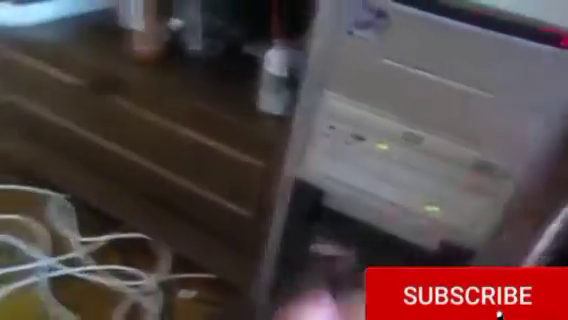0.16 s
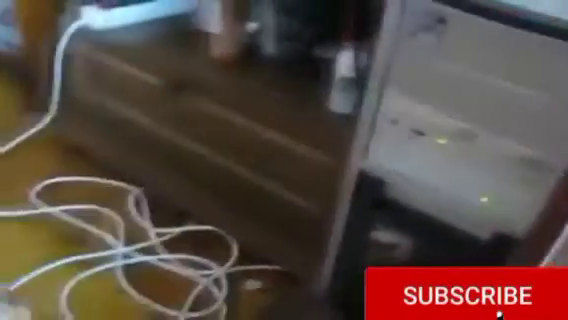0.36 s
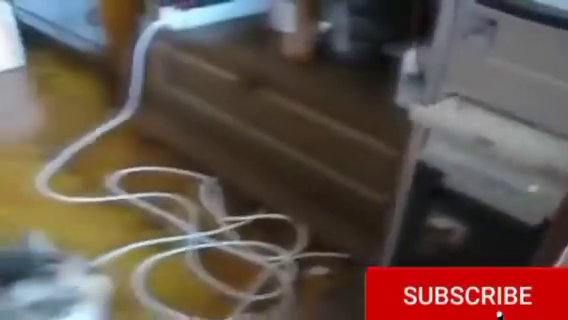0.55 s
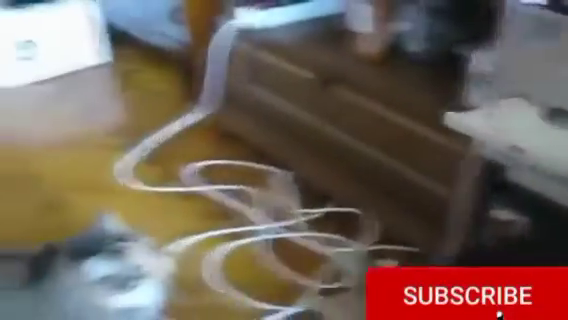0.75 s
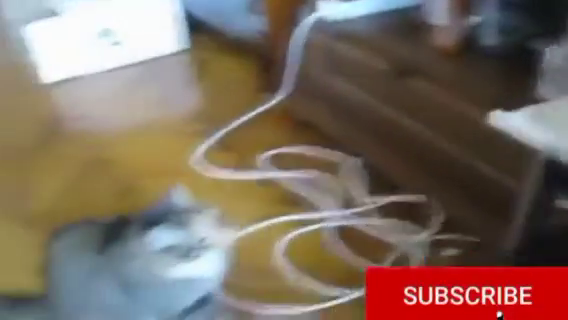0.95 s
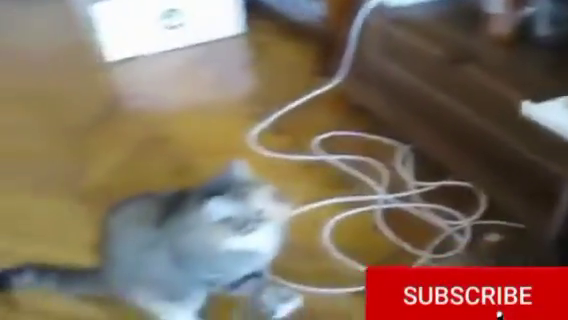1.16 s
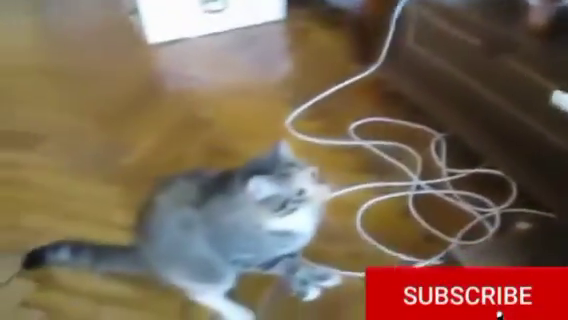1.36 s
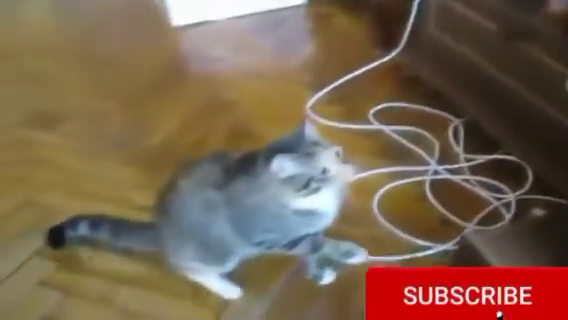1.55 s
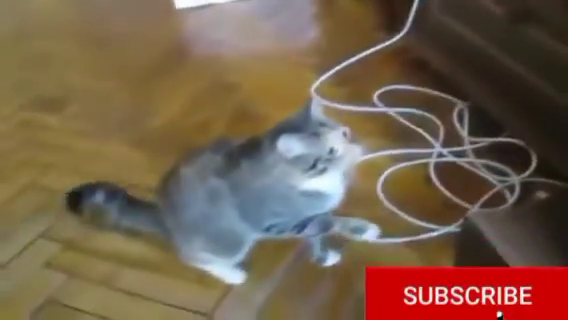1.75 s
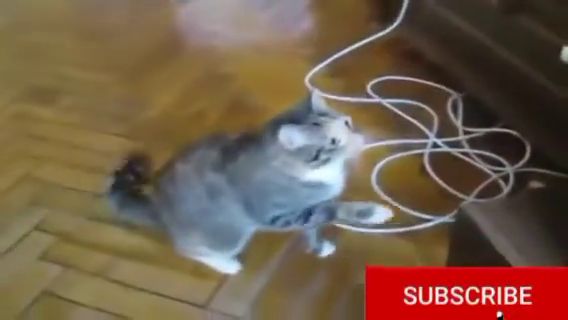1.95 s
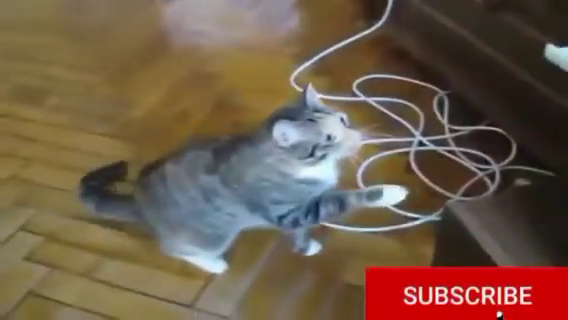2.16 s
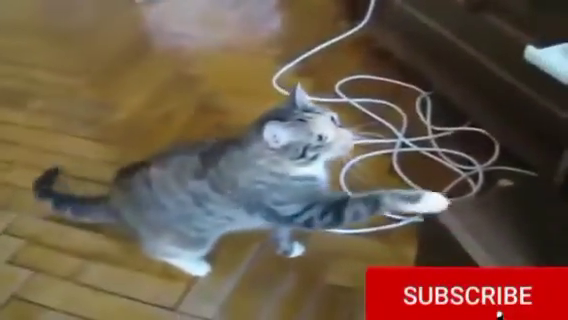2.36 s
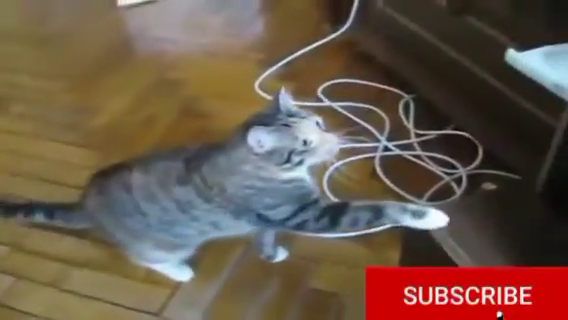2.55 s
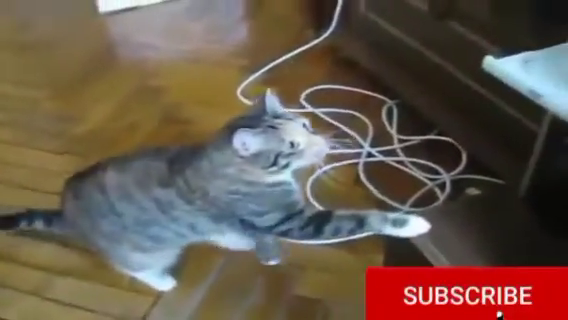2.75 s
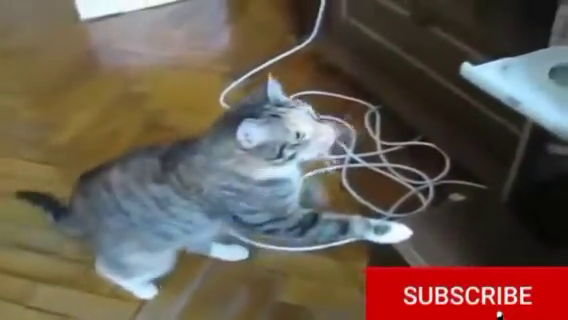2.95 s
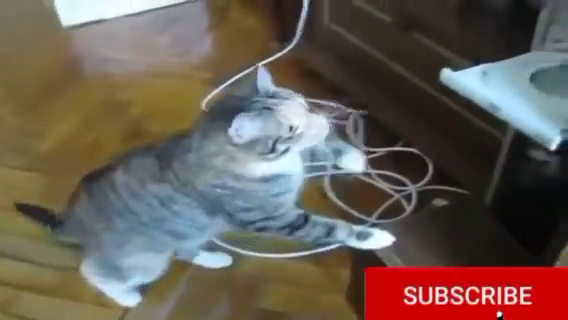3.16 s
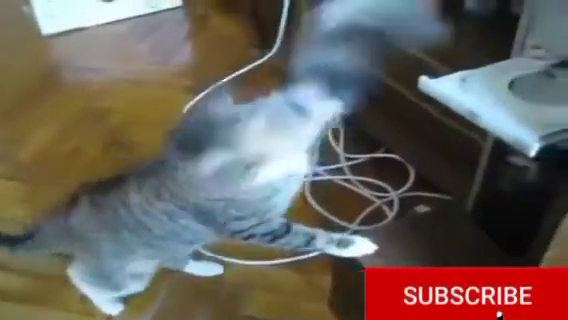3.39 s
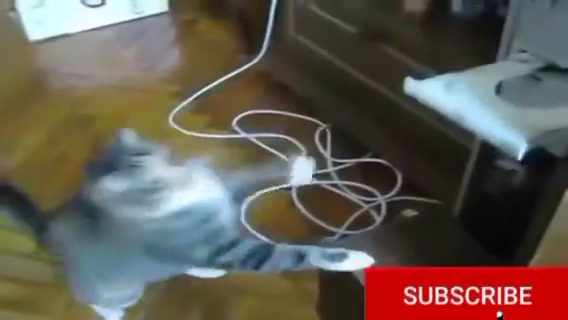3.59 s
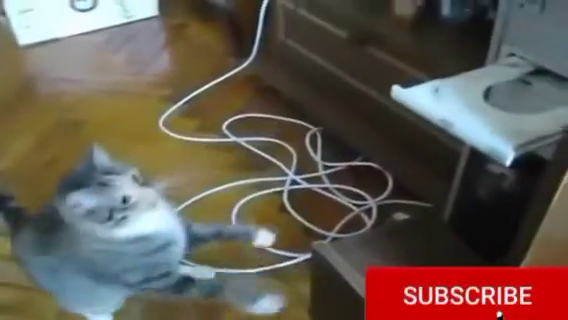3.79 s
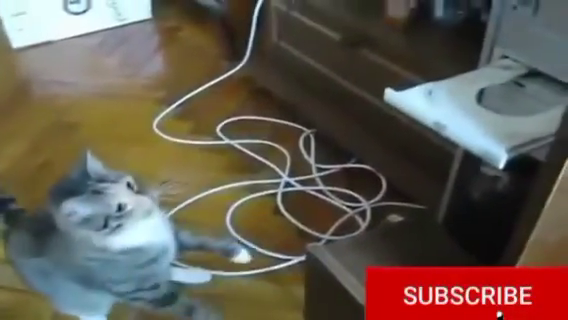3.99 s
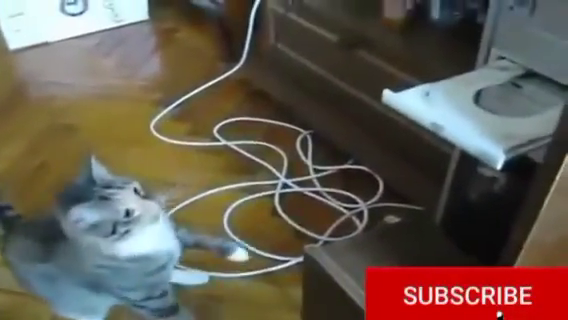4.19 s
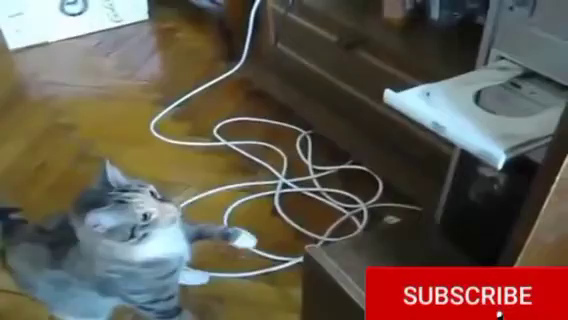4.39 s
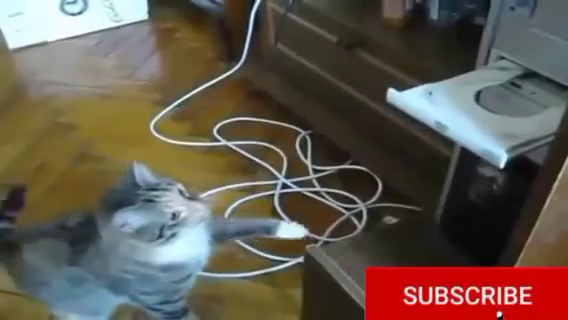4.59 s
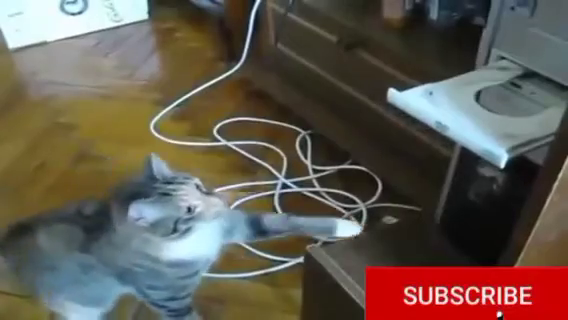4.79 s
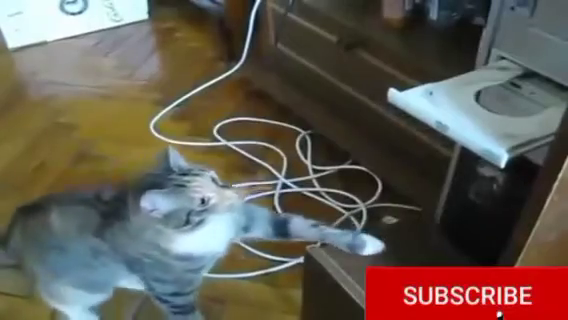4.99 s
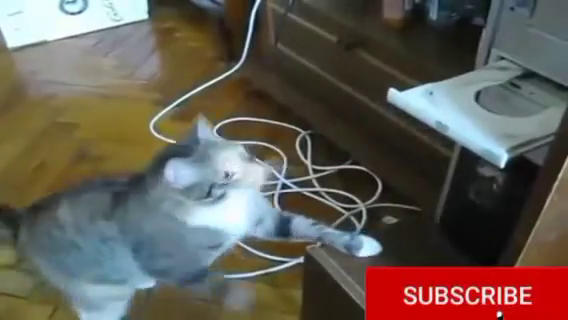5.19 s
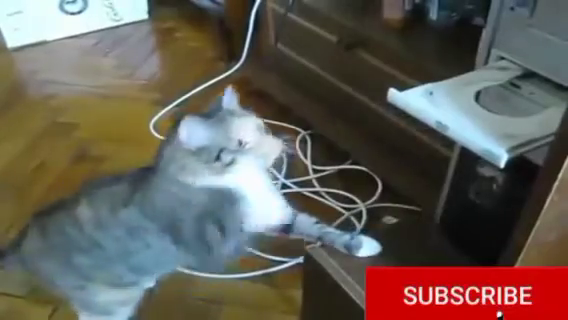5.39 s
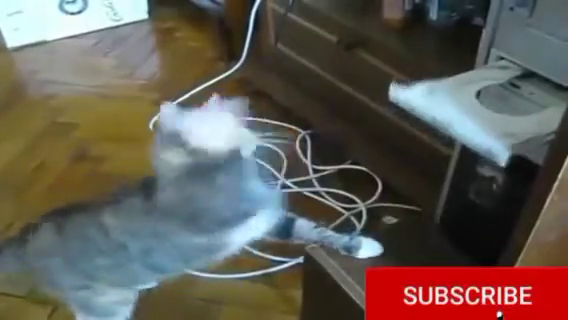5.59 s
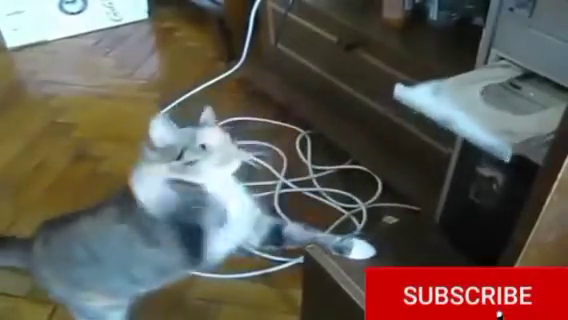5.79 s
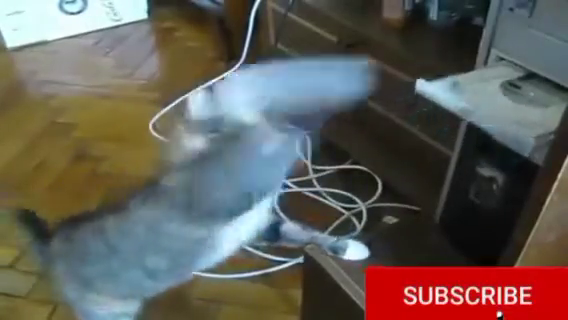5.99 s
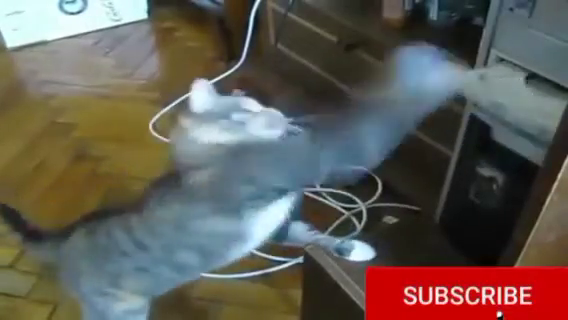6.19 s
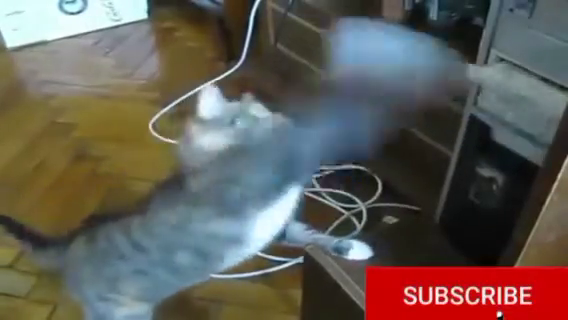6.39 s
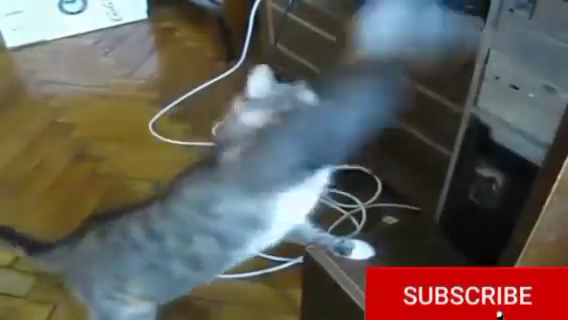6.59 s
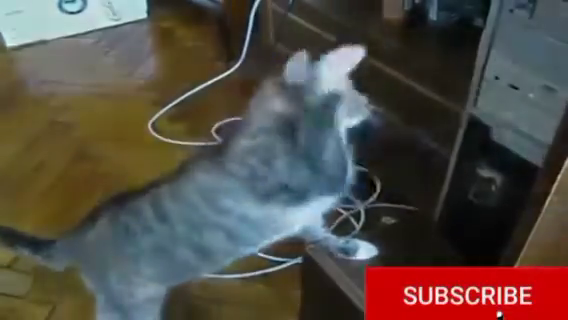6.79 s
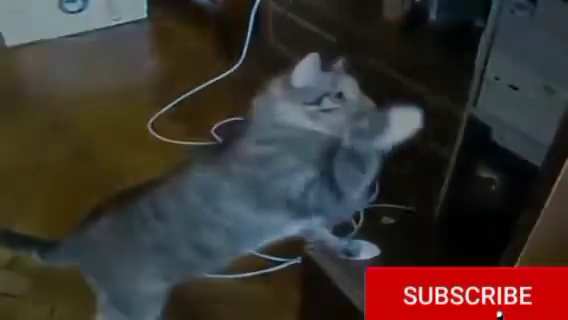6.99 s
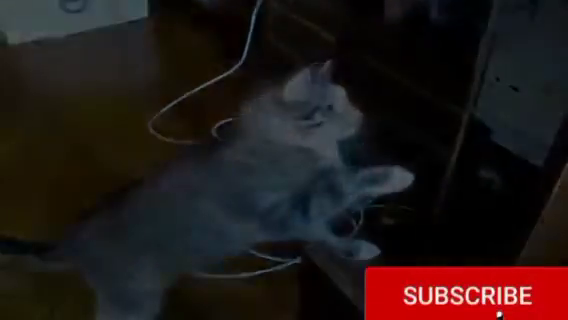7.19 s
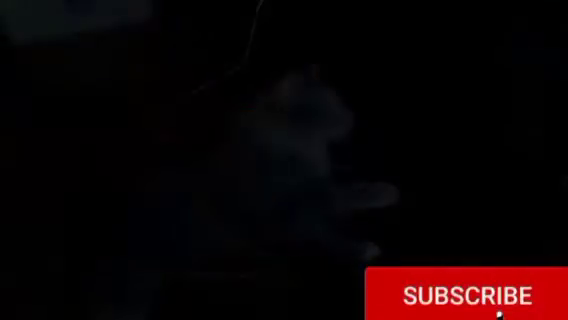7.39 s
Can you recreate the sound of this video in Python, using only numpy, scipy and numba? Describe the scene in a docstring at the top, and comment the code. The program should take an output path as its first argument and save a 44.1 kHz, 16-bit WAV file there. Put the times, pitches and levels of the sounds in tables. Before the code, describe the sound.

In a live room, a desktop computer's fans rush steadily. The disc tray unlatches with quick clicks and whines outward on small gears. After a pause a cat's paw cracks the plastic, leaving it chattering. Later a dry static pop comes, then a flurry of swats over the motor pulling the tray in, ending with a hard latch. A small close microphone clips on the blows.

```python
"""A desktop computer hums with filtered noise and fan tones; a disc hisses until it is braked.
The tray unlatches with knocks and whirs out on gear noise and whine, in a live room.
A cat swats it: bursts ring the plastic, and the tray chatters and scrapes in its rails.
A static spark pops; then the cat bats the tray while it runs back in and latches.
A small camera clips on hard blows and ducks after each, so the room's ring swells back up."""
import sys
import numpy as np
from scipy import signal
from scipy.fft import rfft, irfft, next_fast_len
from scipy.io import wavfile
from scipy.ndimage import map_coordinates
from numba import njit

SR = 44100
rng = np.random.default_rng(int(sys.argv[2]) if len(sys.argv) > 2 else 0)


def store_wav(level_fs):
    """Save 16-bit WAV to argv[1]."""
    pcm = np.round(np.clip(np.atleast_2d(level_fs), -1, 1) * 32767)
    wavfile.write(sys.argv[1], SR, pcm.T.astype(np.int16))


N = 328545
TIME = np.arange(N) / SR


def amp(db):
    """Turn decibels into a gain."""
    return 10 ** (np.asarray(db) / 20)


def unit(x):
    """Scale a sound to an rms of 1."""
    return x / np.sqrt(np.mean(x ** 2) + 1e-20)


def along(points, hz):
    """Read a table of (frequency [Hz], value) on a logarithmic pitch axis."""
    f, v = np.transpose(points)
    return np.interp(np.log(hz + 1), np.log(f), v)


def curves(rows):
    """Draw each column after the time as one value per sample."""
    s, *columns = np.transpose(rows)
    return [np.interp(TIME, s, column) for column in columns]


def wobble(rate):
    """Make a smooth random curve from `rate` random points a second."""
    points = rng.standard_normal(int(N * rate / SR) + 4)
    return map_coordinates(points, [TIME * rate])


def bumps(modes, hz):
    """Add up the power of resonances, each with a centre, a width and a level."""
    return sum(amp(db) ** 2 / (1 + (2 * (hz - centre) / width) ** 2) for centre, width, db in modes)


def coloured(x, gain):
    """Filter with a gain for each frequency; minimum phase, so no sound comes before its cause."""
    size = 2 * next_fast_len(len(x) // 2 + 2048)
    gains = np.maximum(gain(np.fft.rfftfreq(size, 1 / SR)), 1e-6)
    cepstrum = irfft(np.log(gains))
    # fold the negative-time half onto the positive one
    cepstrum[1:size // 2] *= 2
    cepstrum[size // 2 + 1:] = 0
    return irfft(rfft(x, size) * np.exp(rfft(cepstrum)))[:len(x)]


# how loud the fan air is, nearer at first: (time [s], level [dB])
FAN_LEVEL = [(.3, -43.6), (1.6, -47), (7.45, -47)]
# colour of the rushing air: (frequency [Hz], level [dB])
FAN_AIR = [(15, -36), (25, -6.5), (286, -5.5), (318, -7), (637, -6.5), (927, -4), (1060, -8), (1280, -4),
           (1500, -8.5), (2300, -11), (2630, -14), (6540, -19.5), (8100, -25.5), (10000, -23.5),
           (15000, -30)]
# resonances of the vents: (frequency [Hz], width [Hz], level [dB])
FAN_VENTS = [(825, 120, -24.5), (1225, 69, 2), (1745, 106, 7.5), (2315, 56, 12), (3380, 930, 3),
             (4660, 140, 3.5)]
# steady notes of the fans and disk: (frequency [Hz], level [dB])
FAN_TONES = [(863, -63), (959.5, -60), (1261, -62.5)]


def fans():
    """Air rushes through the vents of the case, under slightly unsteady fan and disk tones."""
    noise = rng.standard_normal(N)
    air = unit(coloured(noise, lambda hz: amp(along(FAN_AIR, hz)) * np.sqrt(1 + bumps(FAN_VENTS, hz))))
    tones = np.zeros(N)
    for hz, db in FAN_TONES:
        level = amp(db + 1.15 * wobble(3.27))
        phase = 2 * np.pi * np.cumsum(hz + 1.466 * wobble(5)) / SR
        tones += level * np.sqrt(2) * np.sin(phase)
    return air * amp(curves(FAN_LEVEL)[0] + 0.1 * wobble(9.6)) + tones


def spinning(db=-61, low_hz=9000, high_hz=12000, stop_s=0.54, coast_s=.12):
    """A disc hisses faintly inside the drive until it is braked for ejecting."""
    band = signal.butter(2, [low_hz, high_hz], "band", fs=SR, output="sos")
    hiss = unit(signal.sosfilt(band, rng.standard_normal(N)))
    fade = np.clip((stop_s - TIME) / coast_s + .5, 0, 1)  # halfway down at stop_s
    return amp(db) * fade * hiss


# time for the room's ring to fade by 60 dB: (frequency [Hz], fade time [s])
ROOM_T60 = [(150, 0.43), (400, 0.67), (1000, 0.53), (2800, 0.57), (7000, 0.42), (14000, 0.19)]
# how strongly the room answers: (frequency [Hz], level [dB])
ROOM_SEND = [(60, -10), (150, -1.5), (280, -1), (900, -1.5), (2000, -5.5), (4000, -10), (12000, -5.5)]
# the room's share grows as the camera backs away from the drive: (time [s], level [dB])
NEARNESS = [(0, -3), (.6, -1), (1.3, 0)]


def room(x, s, build_s=0.0016):
    """Add a dense echo that builds up quickly, fades by pitch and differs with the moment s."""
    hz, t, cells = signal.stft(rng.standard_normal(SR * 3 // 4), SR, nperseg=256)
    fade = amp(-60 * t / along(ROOM_T60, hz)[:, None])
    tail = signal.istft(cells * fade * (1 - np.exp(-t / build_s)), SR, nperseg=256)[1]
    size = next_fast_len(len(x) + len(tail), True)
    share_db = np.interp(s, *np.transpose(NEARNESS))
    send = amp(along(ROOM_SEND, np.fft.rfftfreq(size, 1 / SR)) + share_db)
    echo = send * rfft(tail / np.linalg.norm(tail), size)
    return irfft(rfft(x, size) * (1 + echo), size)


def case(x, ripple_db=1.65, spacing_hz=40, onset_hz=2500):
    """Many small overlapping modes of the case put a fine fixed ripple on the treble."""
    grid = np.arange(1000) * spacing_hz
    ripple = rng.standard_normal(len(grid)) * np.minimum(grid / onset_hz, 1)
    return coloured(x, lambda hz: amp(ripple_db * np.interp(hz, grid, ripple)))


# overall colour of the plastic: (frequency [Hz], level [dB])
PLASTIC = [(60, -25.5), (150, -14.5), (260, -14), (800, -10), (2000, -3.5), (3200, -0.5), (4600, 1),
           (6500, -4.5), (10000, -12), (15000, -20.5)]
# main resonances of tray and case: (frequency [Hz], width [Hz], level [dB])
MODES_TRAY = [(246, 43, 3), (572, 190, 2), (1135, 80, 1.5), (1780, 300, -4), (2650, 310, -5),
              (3330, 340, -4.5), (3930, 86, -5.5), (5230, 160, -32.5), (6230, 85, -24)]


def plastic(hz, dense_db=-3):
    """The tray's main modes stand on a bed of many overlapping ones."""
    return amp(along(PLASTIC, hz)) * np.sqrt(amp(dense_db) ** 2 + bumps(MODES_TRAY, hz))


NOTE_DB, NOTE_WIDTH = 4.5, 0.12  # how far a struck spot's mode stands out; its width over its frequency


def knock(s, db, t60, body_db, edge_db, note_hz=None, low_hz=280, body_hz=1400, clack_hz=3200,
          bright_hz=6000, edge_hz=10000, softness=0.96, ring_db=-19, ring_t60=0.088):
    """One contact is a short noise burst that rings the tray; body and edge levels set its colour."""
    out, t = np.zeros(N + 2 * SR), np.arange(SR // 8) / SR
    norm = np.sqrt(np.mean(plastic(np.linspace(0, SR / 2, num=SR // 20)) ** 2))
    # long contacts are scrapes and start softly
    rise = 1 - np.exp(-t / (softness * t60 ** 2))
    # the case rings on a little after each contact
    fade = amp(-60 * t / t60) + amp(ring_db - 60 * t / ring_t60)
    burst = np.sign(rng.standard_normal(len(t))) * rise * fade
    contact = [(low_hz, body_db / 2), (2 * low_hz, body_db), (body_hz, body_db),
               (clack_hz, 0), (bright_hz, 0), (edge_hz, edge_db)]
    # one well-damped mode stands out, depending on the struck spot
    spot = [(note_hz, NOTE_WIDTH * note_hz, NOTE_DB)] if note_hz else []
    ring = coloured(burst, lambda hz: plastic(hz) * amp(along(contact, hz)) * np.sqrt(1 + bumps(spot, hz)))
    blow = room(ring / norm, s)
    out[round(s * SR):][:len(blow)] = amp(db) * blow
    return out[:N]


# tray runs: outward the pitch leaps up and then sags; inward it climbs slowly and drops at the end:
# (time [s], gear whir level [dB], gear mesh rate [Hz])
RUN_OUT = [(.5, -46, 2318), (.6, -38, 2337), (.665, -42, 5490), (.75, -41, 5580), (.79, -41, 4150),
           (.9, -42.5, 3150), (1.16, -44, 3090), (1.355, -43.5, 2753), (1.385, -51, 2500)]
RUN_IN = [(5.95, -44, 2435), (6.05, -31, 2933), (6.25, -49, 3080), (6.52, -38, 3120), (6.78, -36, 3240),
          (6.9, -44, 2300)]
# colour of the gear whir: (frequency [Hz], level [dB])
WHIR = [(100, -32), (300, -11.5), (700, -3.5), (1800, -2), (3300, 4), (5500, -1.5), (7500, -6.5),
        (11000, -15.5), (15000, -16)]
# whine notes: (multiple of the motor pulse rate, level [dB])
GEAR_ORDERS = [(7, -12), (9, 3), (11, -5.5), (12, -9), (16, -11), (18, -12)]


def drive(travel, whine_db, case_ring_db, jitter=0.0201, rattle_db=1.5, waver_db=4, speed_db=6):
    """Gear teeth rasp once a motor pulse and whine at multiples of that changing rate."""
    db, mesh_hz = curves(travel)
    start, stop = travel[0][0], travel[-1][0]
    pulse_hz = mesh_hz / 9 * (1 + jitter * wobble(150))
    motor = 2 * np.pi * np.cumsum(pulse_hz) / SR
    teeth = rng.standard_normal(N) * (1 + 0.41 * np.cos(motor)) * amp(rattle_db * wobble(90))
    rasp = unit(coloured(teeth, lambda hz: amp(along(WHIR, hz))))
    whine = np.zeros(N)
    for order, order_db in GEAR_ORDERS:
        whine += amp(whine_db + order_db + waver_db * wobble(55.1)) * np.sin(order * motor)
    # the whine is louder by speed_db per octave of speed
    usual_hz = np.median(mesh_hz[(TIME > start) & (TIME < stop)])
    whine = whine * amp(speed_db * np.log2(mesh_hz / usual_hz))
    # a low ring of the case, near 260 Hz, swells and fades briefly as the run begins
    swell = np.exp(-((TIME - start - .075) / .035) ** 2)
    case_ring = amp(case_ring_db) * swell * np.sin(motor)
    level = amp(db) * (TIME > start) * (TIME < stop)
    return room(level * (rasp + whine), start)[:N] + level * case_ring


# clicks of the button, cam and latch: (time [s], level [dB], time to fade by 60 dB [s],
# hollow body [dB], sharp edge [dB], note of the struck part [Hz])
LATCH = [(.054, -36.5, 0.015, 14.5, -10, 1730), (.533, -30, 0.024, 19, -1, 1250),
         (.544, -25, 0.027, 12, 5, 4900), (.554, -21.5, 0.025, 8.5, 10.5, 10100),
         (.612, -18, 0.033, 6.5, -14, 2000), (.623, -22, .06, 9.5, -5, 500),
         (.67, -23.5, 0.033, 7, -12, 1860), (.745, -22.5, .075, 1, -14, 2920),
         (6.838, -25, 0.033, 19.5, -1, 1010), (6.8665, -1.5, 0.022, 7.5, -6.5, 1980)]


def latch():
    """The mechanism clicks as it releases the tray and again as it locks it."""
    return sum(knock(*click) for click in LATCH)


def spark(s=5.504, db=-4, rise_s=.00007, fall_s=0.00025, coupling_hz=150):
    """Static jumps from paw to tray: one electrical pop, with no room on it."""
    t = np.maximum(TIME - s, 0)
    pulse = (1 - np.exp(-t / rise_s)) ** 2 * np.exp(-t / fall_s)
    high_pass = signal.butter(1, coupling_hz, "high", fs=SR)
    return amp(db) * signal.lfilter(*high_pass, pulse / pulse.max())


# colour of the case's boom: (frequency [Hz], level [dB])
THUD = [(30, -18), (75, -2), (130, -4.5), (190, -5), (255, 3), (340, -10), (480, -2.5), (650, -1),
        (1200, -22), (5000, -63)]
SHOVE_LAG_S = 0.021  # the soft paw follows the claw
SEAT_S, SEAT_DB = 6.87, -37.5  # the case booms as the tray seats


def thuds(rise_s=0.019, t60=0.66):
    """The paw's soft shoves and the seating tray give the case a dull boom."""
    pushes = [(s + SHOVE_LAG_S, db) for s, _, _, db in SWATS] + [(SEAT_S, SEAT_DB)]
    push = np.zeros(N)
    for s, db in pushes:
        t = np.maximum(TIME - s, 0)
        push += amp(db - 60 * t / t60) * (1 - np.exp(-t / rise_s))
    return push * unit(coloured(rng.standard_normal(N), lambda hz: amp(along(THUD, hz))))


CLACK_T60, CLACK_HZ = 0.033, 4130  # time to fade by 60 dB [s] and typical note of a rail contact
CLACK_BODY_DB, CLACK_EDGE_DB = -4, 1  # colour of a clack at 0 dB
HOLLOW_PER_DB, DULL_PER_DB = 0.3735, 0.12  # each dB weaker is this much hollower and duller [dB]


def clack(s, db, note_spread=0.19):
    """The tray hits a rail: the weaker the contact, the hollower and duller it sounds."""
    note_hz = CLACK_HZ * np.exp(note_spread * rng.standard_normal())
    body_db = CLACK_BODY_DB - HOLLOW_PER_DB * db
    edge_db = CLACK_EDGE_DB + DULL_PER_DB * db
    return knock(s, db, CLACK_T60, body_db, edge_db, note_hz)


# bouts of the tray rocking in its rails:
# (start time [s], first level [dB], period [s], loss per swing [dB], swings)
ROCKING = [(3.7696, -10.5, 0.051, 5, 3), (3.943, -30.5, 0.044, 3, 5), (5.76, -4, 0.023, 2.5, 3),
           (5.986, -11.5, .0442, 1.5, 3), (6.157, -24.5, 0.021, -0.5, 5)]
# the tray scrapes along its rails: (time [s], level [dB])
SCRAPES = [(.489, -34), (.82, -28.5), (1.33, -33), (3.724, -24), (3.75, -21.5), (5.946, -15.5),
           (6.295, -8.5), (6.345, -12.5), (6.562, -16), (6.75, -19.5), (6.888, -10.5)]
SCRAPE_T60, SCRAPE_BODY_DB, SCRAPE_EDGE_DB = 0.11, 6.5, -2.5  # time to fade by 60 dB [s] and colour


def rails():
    """The loose tray rocks, one clack per swing at a steady change of level, and scrapes when pushed."""
    clacks = np.zeros(N)
    for s, db, period, loss_db, swings in ROCKING:
        for k in range(round(swings)):
            clacks += clack(s + k * period, db - k * loss_db)
    scrapes = sum(knock(s, db, SCRAPE_T60, SCRAPE_BODY_DB, SCRAPE_EDGE_DB) for s, db in SCRAPES)
    return clacks + scrapes


# paw blows on the tray: (time [s], level [dB], note of the struck spot [Hz],
# weight of the shove behind it [dB])
SWATS = [(3.6728, 5, 4800, -28), (5.7547, -3.5, 3700, -36), (5.863, -10, 4100, -48),
         (5.8794, 4.5, 4200, -43), (6.272, 3, 5300, -42), (6.445, 3.5, 4020, -34), (6.6612, 3, 3140, -50)]
SWAT_T60, SWAT_BODY_DB, SWAT_EDGE_DB = 0.026, -1.5, 2  # a claw's hard contact: fade by 60 dB [s], colour
REBOUND_S, REBOUND_LOSS_DB = .021, 10  # the driven tray springs back against its rail


def swats():
    """Each paw blow cracks on the plastic; once the motor starts pulling the tray in, it rebounds."""
    blows = sum(knock(s, db, SWAT_T60, SWAT_BODY_DB, SWAT_EDGE_DB, note_hz) for s, db, note_hz, _ in SWATS)
    driven = [(s, db) for s, db, _, _ in SWATS if s > RUN_IN[0][0]]
    rebounds = sum(clack(s + REBOUND_S, db - REBOUND_LOSS_DB) for s, db in driven)
    return blows + rebounds


def scene():
    """The tray, its drive and the cat sound over the fans."""
    motor = drive(RUN_OUT, whine_db=-9.0, case_ring_db=5.5) + drive(RUN_IN, whine_db=-21, case_ring_db=-12)
    through_case = case(latch() + swats() + rails() + motor)
    return (fans() + spinning() + through_case + thuds() + spark())[None]


@njit
def follow(level, attack, release):
    """Follow the peaks with a quick rise and a slow fall (times in samples)."""
    out, held = np.empty_like(level), 0.
    for i in range(len(level)):
        held += (level[i] - held) / attack if level[i] > held else -held / release
        out[i] = held
    return out


# a notch in the camera's treble: (frequency [Hz], level [dB])
MIC_DIP = [(7000, 0.5), (7700, -4.5), (8000, -11), (8170, -25), (8330, -10), (8600, -4.5), (9300, 1.5)]
TOP_HZ = 15150  # nothing much passes above this


def record(dry, threshold_db=-10, attack_s=0.00094, release_s=0.08, ceiling_db=-1):
    """Gain control ducks after each blow, the first peaks clip, then come a notch and a treble limit."""
    x = dry[0]
    loudness = follow(np.abs(x), attack_s * SR, release_s * SR)
    x = x / np.maximum(1, loudness / amp(threshold_db))
    x = x / (1 + (x / amp(ceiling_db)) ** 4) ** (1 / 4)  # rounded clipping
    x = coloured(x, lambda hz: amp(along(MIC_DIP, hz)))
    low_pass = signal.ellip(10, .1, 80, TOP_HZ, fs=SR, output="sos")
    return signal.sosfilt(low_pass, x)[None]


dry = scene()
out = record(dry)
store_wav(out)
```